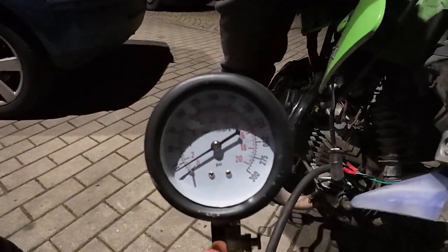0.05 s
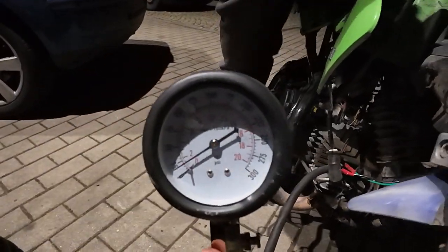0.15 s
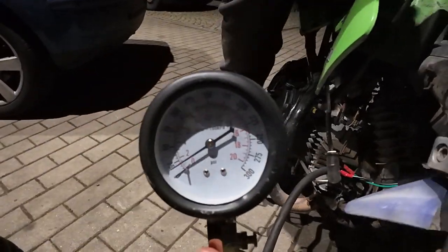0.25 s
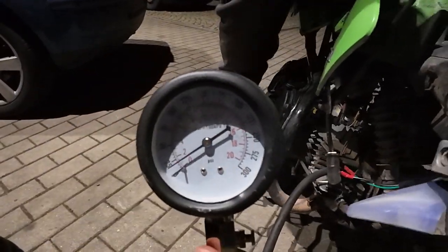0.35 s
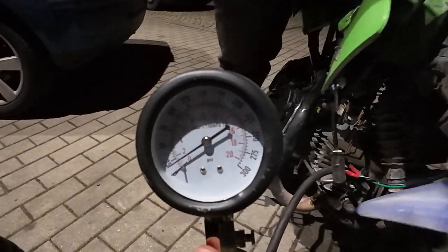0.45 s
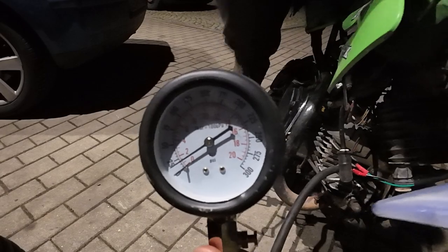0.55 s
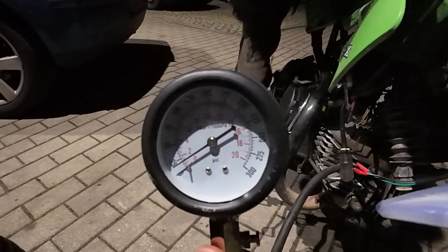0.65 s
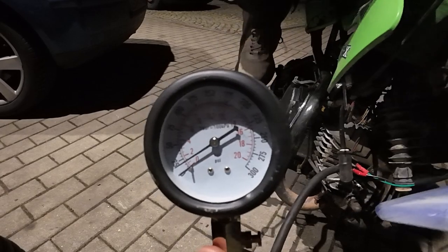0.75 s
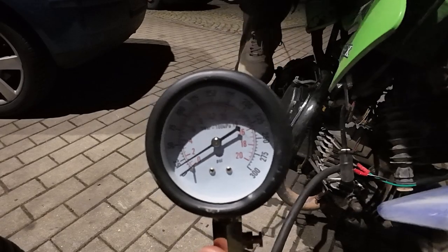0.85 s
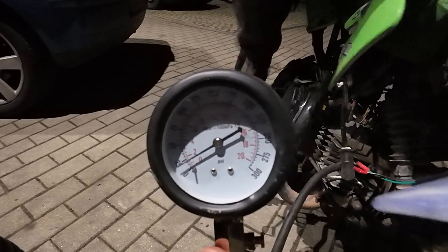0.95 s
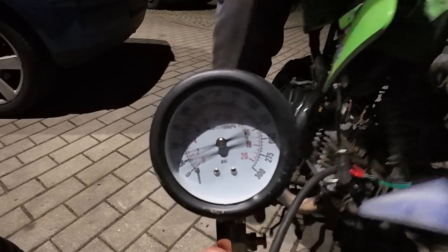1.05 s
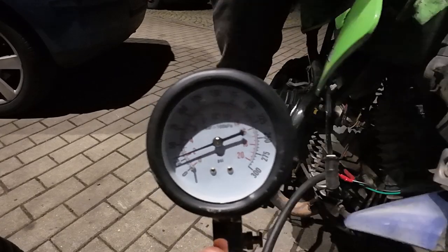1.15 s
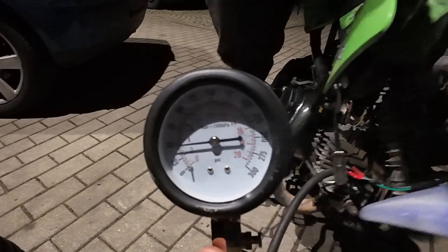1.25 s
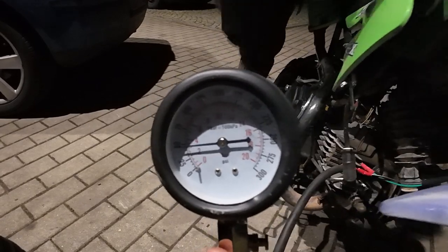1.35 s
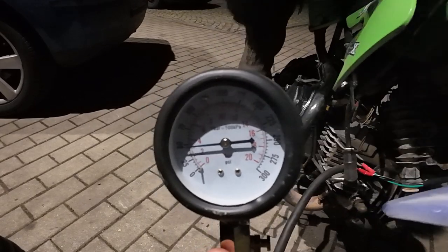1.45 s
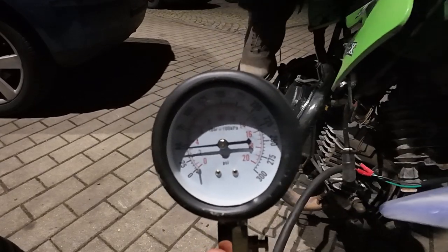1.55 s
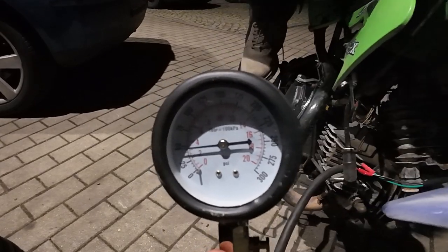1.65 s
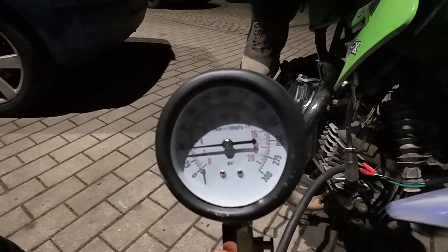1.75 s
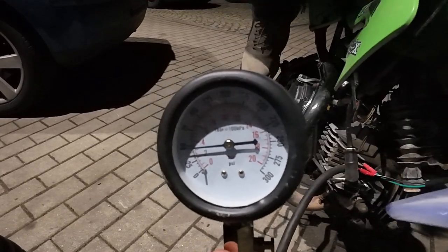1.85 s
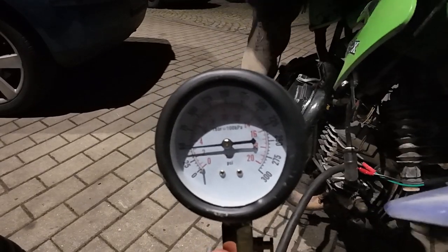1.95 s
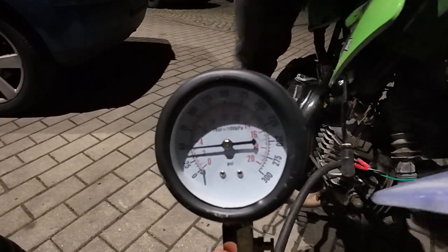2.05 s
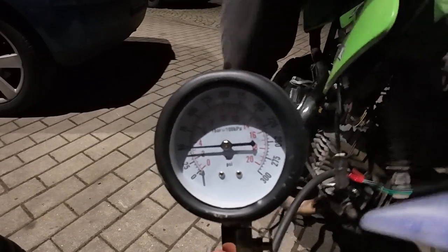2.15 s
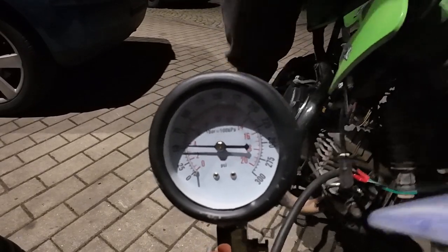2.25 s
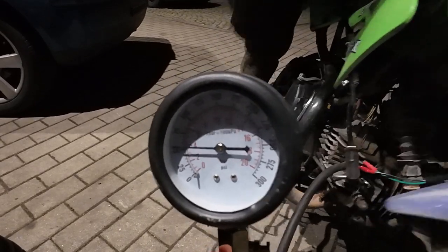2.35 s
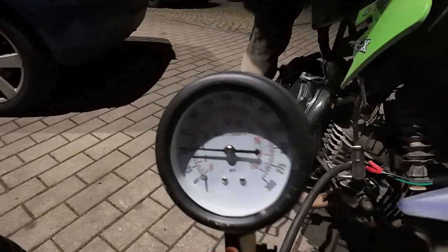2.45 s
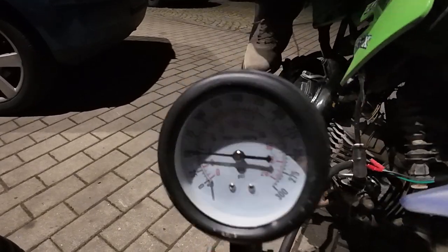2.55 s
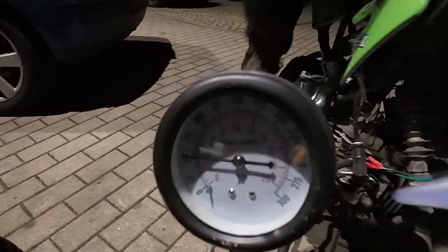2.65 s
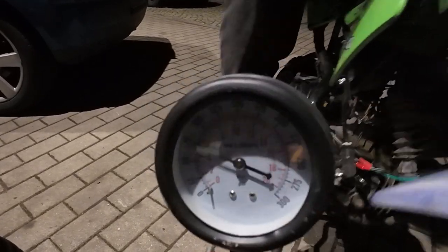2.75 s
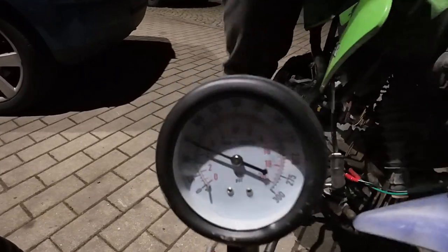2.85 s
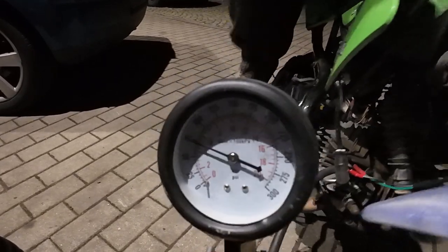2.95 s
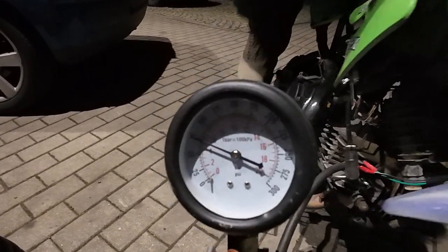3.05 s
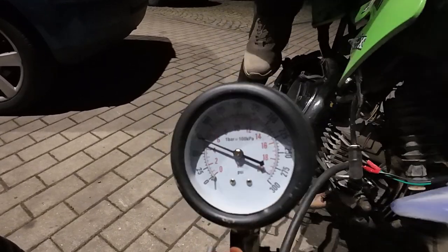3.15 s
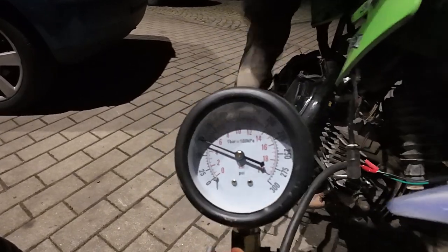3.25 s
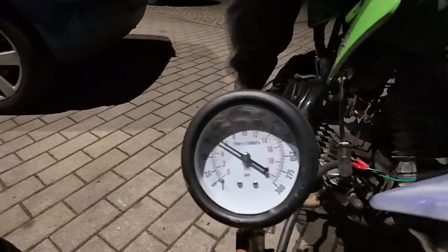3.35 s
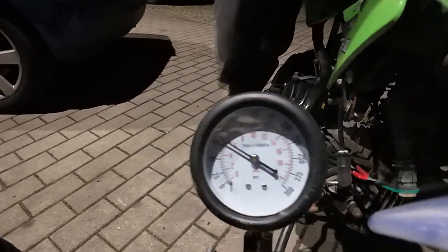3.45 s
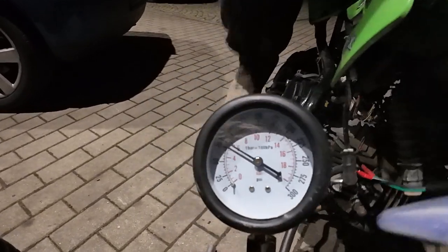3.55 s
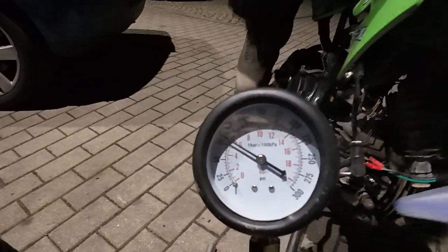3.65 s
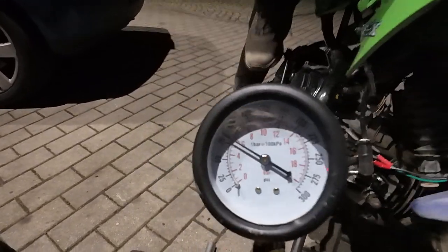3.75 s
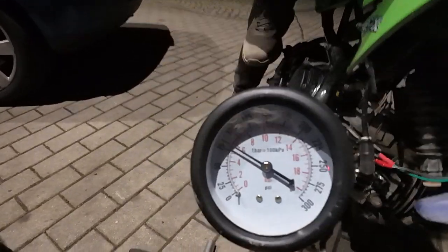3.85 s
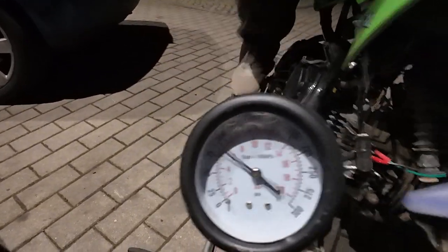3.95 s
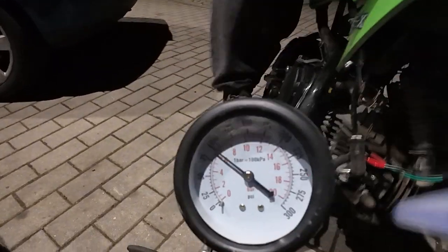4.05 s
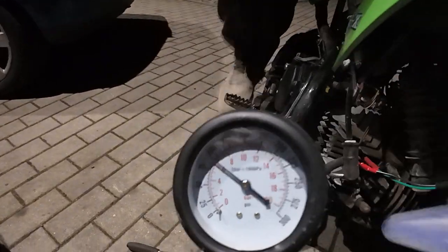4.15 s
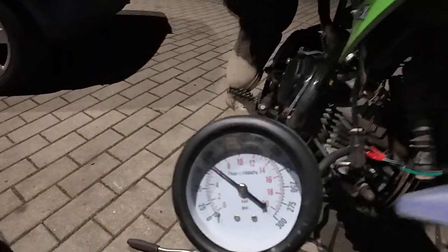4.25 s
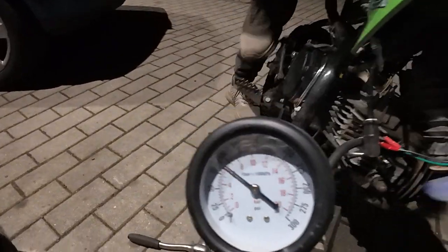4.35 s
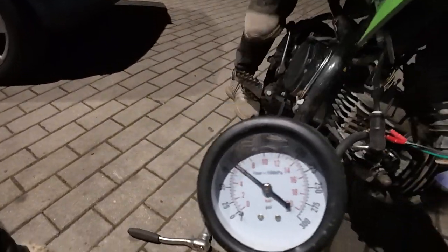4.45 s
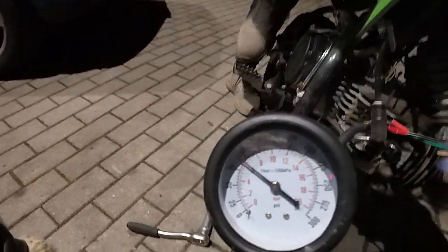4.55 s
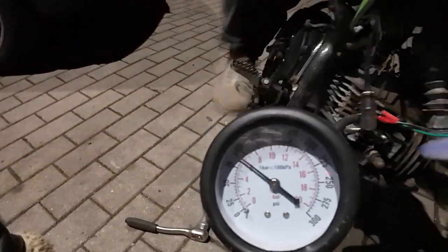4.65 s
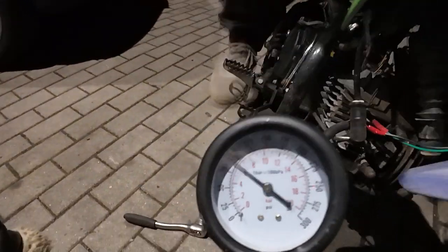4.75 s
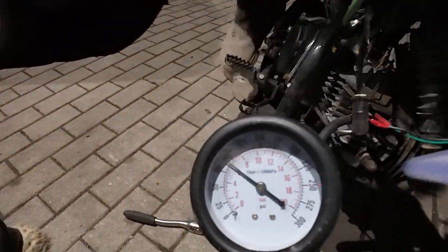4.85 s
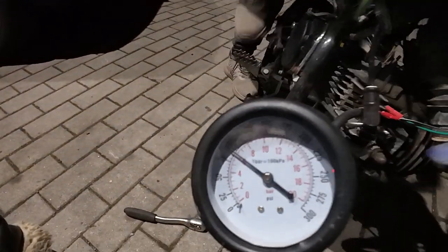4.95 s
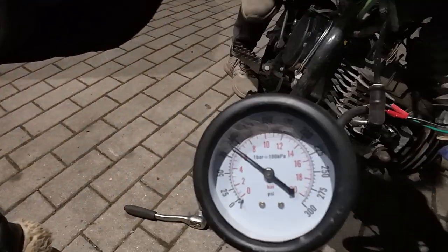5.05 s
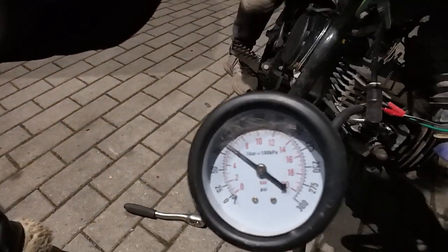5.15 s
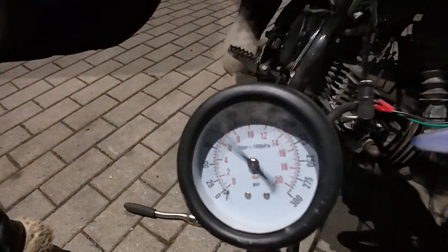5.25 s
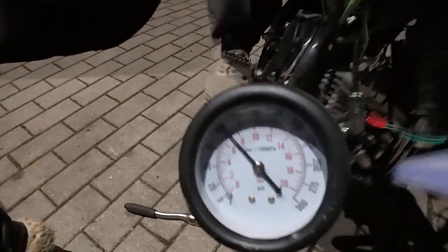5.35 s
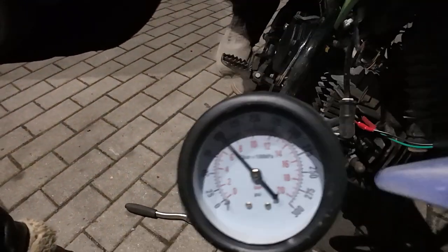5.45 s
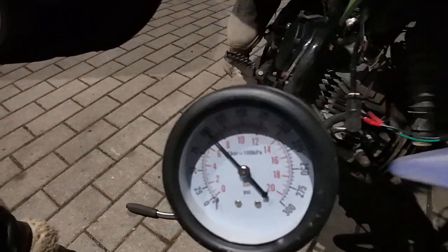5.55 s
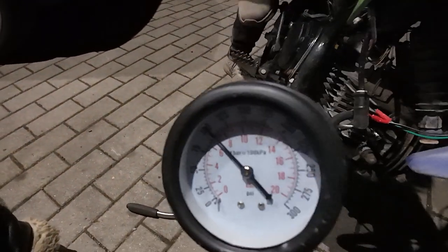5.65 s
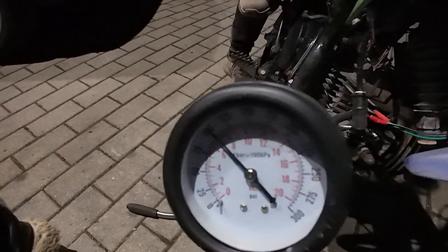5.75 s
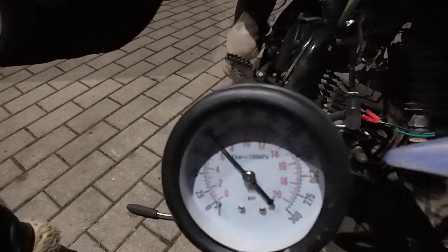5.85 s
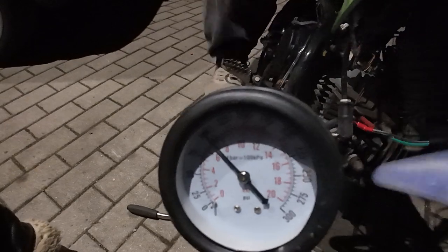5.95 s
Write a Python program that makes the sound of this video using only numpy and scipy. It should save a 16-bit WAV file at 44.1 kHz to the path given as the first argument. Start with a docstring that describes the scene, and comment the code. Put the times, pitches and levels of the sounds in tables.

```python
"""A boot scrapes and a kick lever ticks in a paved yard, close to a hand-held microphone pair.
Then a small single-cylinder engine is kicked over eight times: the starter gear clunks in, gear teeth
rattle, air hisses through the passages, exhaust strokes thump in the pipe, and between kicks the lever
clinks back on its stop. Light wind rumbles in the microphones; the yard adds short, bright echoes."""
import sys
import numpy as np
from scipy import signal
from scipy.fft import rfft, irfft, next_fast_len
from scipy.io import wavfile

SR = 44100
rng = np.random.default_rng(int(sys.argv[2]) if len(sys.argv) > 2 else 0)


def unload_wav(signal):
    """Save mono or channel-first audio to the path in sys.argv[1] as 16-bit WAV at rate SR, clipped to [-1, 1]."""
    wavfile.write(
        sys.argv[1],
        SR,
        np.round(np.clip(np.atleast_2d(signal).T, -1, 1) * 32767).astype(np.int16),
    )


N = 265041

# Levels are relative within each source; spectra give level per hertz.
# spectra of the distant air and of a faint rustle: f/Hz, level/dB
AIR_SPECTRUM = [(200, -21), (320, -3.5), (900, -3.5), (2500, -13.5), (5000, -18.5), (13800, -26.5),
                (16200, -31)]
RUSTLE_SPECTRUM = [(400, -29), (1000, -22), (6400, -12), (8200, -18), (10100, -16), (11800, -21),
                   (13600, -10), (16200, -21)]
# course of the rustle: t/s, level/dB
RUSTLE_LEVELS = [(0, -58.5), (.5, -61), (.75, -50.5), (.9, -99)]
# wind on the microphones: t/s, level/dB
WIND_LEVELS = [(0, -56), (.25, -50), (.35, -31.5), (.45, -50), (1.45, -49.5), (1.79, -41.5), (1.83, -33),
               (1.99, -31.5), (2.04, -43), (2.62, -41.5), (3.03, -34), (3.18, -59), (3.4, -31),
               (3.899, -50), (4.6, -47), (5.3, -33.5), (5.8, -26), (6.01, -39)]
# its rumble: f/Hz, level/dB
WIND_SPECTRUM = [(12, -33), (20, 5.5), (101, -7.5), (170, -13.5), (262, -26), (304, -34), (334, -58),
                 (500, -78), (650, -119), (1100, -120)]
# boot rubbing on the lever before the first kick: t/s, level/dB
SCRAPE_LEVELS = [(0.098, -55.5), (.2, -46.5), (.24, -38.5), (.3, -42.5), (.34, -36.5), (.42, -37.5),
                 (.46, -57), (.6, -48.5), (0.731, -46.5)]
# its grit: f/Hz, level/dB
SCRAPE_SPECTRUM = [(88, -49), (150, 0.5), (335, -10.5), (615, -12), (876, -10.5), (2240, -19), (9020, -32),
                   (13600, -35), (16200, -35)]
# knocks and ratchet ticks of the linkage: t/s, level/dB, centre f/Hz
LINKAGE_TICKS = [(0.098, -46, 1410), (0.135, -40, 402), (.157, -50, 9000), (.169, -25.5, 920),
                 (.197, -42, 1000), (0.221, -29, 2530), (0.232, -22, 1570), (.255, -20.5, 1180),
                 (.326, -26, 550), (0.351, -29.5, 2260), (0.393, -21.5, 1370), (.405, -32.5, 2520),
                 (.414, -43, 2500), (.426, -38.5, 3020), (0.582, -33, 1620), (0.638, -32.5, 1090),
                 (.685, -34.5, 1330), (1.041, -16, 3200), (1.218, -13, 2200), (1.399, -39, 5130),
                 (1.42, -40, 5030), (1.491, -38, 3770), (1.513, -34.5, 1270), (1.615, -39, 1390),
                 (1.841, -60, 4850), (1.881, -55, 2040), (1.956, -61, 2150), (2.15, -13, 2670),
                 (2.822, -21, 1540), (4.755, -17, 1980), (5.41, -10, 3020)]
# lever taking up its slack: t/s, level/dB
SLACK_KNOCKS = [(1.989, -58.5), (3.303, -32), (3.948, -33.5), (4.598, -24.5), (5.206, -38.5),
                (5.859, -33.5)]
# lever hitting its stop: t/s, level/dB, ring level/dB, ring time factor (the boot damps it)
LEVER_CLINKS = [(0.7422, -15.5, -20, 1.12), (1.5684, -14, -15.5, 1.37), (2.5148, -13.5, -18, 1),
                (3.1588, -14.5, -11.5, 0.71), (3.786, -15.5, -26, 0.82), (4.4815, -23, -41, .9),
                (5.1025, -15, -16, 1), (5.731, -13.5, -16, 0.73)]
# modes of the steel arm: f/Hz, level/dB, T60/s
LEVER_MODES = [(1023, -32, .2), (1319, -22, .5), (1925, -13, .16), (2560, -12, .28), (3185, -10, .36),
               (3530, -8, .12), (3828, -7, .23), (3865, -2, .12), (4340, -5, .09), (4834, -14, .15),
               (6108, -18, .15), (7400, -25, .18)]
# crack against the stop: f/Hz, level/dB
CRACK_SPECTRUM = [(240, -56), (400, -26.5), (1470, -8.5), (2570, -9.5), (3560, -3.5), (4560, -11),
                  (5000, -12), (6610, -18), (13100, -27.5), (16200, -35)]
# starter gear engaging: t/s, chatter level/dB, thud level/dB
STARTER_CLUNKS = [(0.9616, -15, -22.5), (2.049, -7, -22.5), (2.682, -7.5, -19.5), (3.3298, -6, -19.5),
                  (3.9738, -1, -14), (4.6269, 0.5, -19.5), (5.2527, -5.5, -15), (5.8864, -1.5, -13.5)]
# teeth chattering into mesh: f/Hz, level/dB
MESH_SPECTRUM = [(290, -2.5), (500, -12), (650, -1.5), (991, -3.5), (1680, -1), (1990, -5), (3270, -7.5),
                 (5220, -11), (7080, -24), (13400, -29.5), (16200, -35)]
# crankcase modes: f/Hz, level/dB, T60/s
CRANKCASE_MODES = [(199, -4, 0.054), (299, -25.5, 0.13), (574.7, 0.5, 0.06), (926, -50, 0.017)]
# gear train in each kick: start t/s, level/dB, fastest t/s, level/dB, stop t/s, level/dB, hiss level/dB
KICKS = [(0.997, -34, 1.216, -25.5, 1.55, -67.5, -25), (2.079, -30.5, 2.306, -26, 2.5, -47, -26),
         (2.712, -32, 2.95, -26.5, 3.15, -44.5, -26.5), (3.359, -31.5, 3.61, -27.5, 3.78, -42, -23),
         (4.004, -28, 4.21, -25, 4.58, -53, -25.5), (4.653, -28, 4.85, -24.5, 5.09, -48.5, -23.5),
         (5.287, -27, 5.525, -25, 5.85, -51, -25.5), (5.917, -26, 6.12, -32, 6.3, -59, -21.5)]
# slow piston strokes as the crank coasts: start t/s, length/s, hiss level/dB
COASTING_STROKES = [(1.237, 0.053, -25.5), (1.301, 0.083, -29), (2.3, 0.048, -34), (2.349, 0.059, -25),
                    (2.39, .1, -34), (2.963, 0.061, -34), (3.023, 0.061, -26), (3.077, 0.091, -30),
                    (3.587, 0.05, -29.5), (3.64, 0.052, -24), (3.685, 0.096, -27.5), (4.244, 0.074, -23.5),
                    (4.346, 0.068, -27), (4.422, 0.055, -30.5), (4.876, 0.05, -23), (4.927, .053, -25),
                    (4.966, 0.1, -32), (5.529, 0.058, -24), (5.579, 0.077, -26.5), (5.66, 0.14, -30.5)]
# crank rocking back once the lever is home: start t/s, end t/s, gear level/dB, hiss level/dB
CRANK_ROCKS = [(3.196, 3.296, -40, -41), (3.814, 3.922, -40, -39)]
# resonances of the air passages and of the engine covers: f/Hz, width/Hz, level/dB
PASSAGE_MODES = [(660, 245, -7), (1761, 113, -0.5), (3056, 186, 2.5), (4580, 1040, -5.5), (5840, 520, -9.5),
                 (8280, 280, -3), (9860, 460, -15.5), (13800, 610, -11), (14200, 630, -25)]
COVER_MODES = [(1070, 870, -14), (1544, 49, 3.5), (2183, 190, 8.5), (2560, 340, -8), (3820, 154, 5),
               (4350, 83, -6.5), (4985, 330, 2), (6370, 150, 1)]
# spectra of the rattling gears and of the shaking frame: f/Hz, level/dB
GEAR_SPECTRUM = [(150, -13), (250, -0.5), (348, -8), (1180, -6), (1540, -10.5), (3040, -2.5), (7150, -12.5),
                 (8370, -8), (12100, -20), (13900, -22), (16200, -74)]
FRAME_SPECTRUM = [(15, -51), (40, 4.5), (100, 5), (300, -14), (500, -54)]
# exhaust thumps: first crest t/s, level/dB, starting f/Hz, delay until the valve shuts/s
EXHAUST_THUMPS = [(1.052, -4.5, 73, .022), (1.154, -4.5, 69.5, .026), (2.0973, -11.5, 68.6, .038),
                  (2.1999, -4, 68.6, .02), (2.3208, -6.5, 67.7, .058), (2.7994, -6, 69.7, .021),
                  (2.9058, -7, 68, .03), (3.424, -5.5, 65.7, .022), (3.5303, -7.5, 70, .036),
                  (4.064, -4.5, 65, .021), (4.1613, -6.5, 69.8, .026), (4.6794, -9, 68, .023),
                  (4.7748, -4.5, 67.5, .0233), (4.8978, -8.5, 67, .048), (5.362, -4.5, 75.5, .02),
                  (5.452, -4.5, 70, .023), (5.6068, -15.5, 62.5, .07), (5.9924, -4, 75, .009)]
# share of the sound that flits between the microphones: f/Hz, level/dB
FLIT_SPECTRUM = [(30, -21), (100, -31.5), (1000, -28.5), (3000, -17), (8000, -3), (16000, -6.5)]


def amp(db):
    """Decibels to gain."""
    return 10 ** (np.asarray(db) / 20)


def unit_rms(x):
    """Scales to rms 1."""
    return x / np.sqrt(np.mean(x ** 2) + 1e-20)


def gain_at(spectrum, hz):
    """Gain of a spectrum, read on a log-frequency axis."""
    f, db = np.transpose(spectrum)
    return amp(np.interp(np.log(hz + 1), np.log(f + 1), db))


def add(mix, s, sound):
    """Mixes a sound in at s seconds."""
    part = mix[round(s * SR):][:len(sound)]
    part += sound[:len(part)]


def coloured(x, spectrum):
    """Shapes x by a spectrum, rms 1."""
    size = next_fast_len(len(x))
    gain = gain_at(spectrum, np.fft.rfftfreq(size, 1 / SR))
    return unit_rms(irfft(rfft(x, size) * gain, size)[:len(x)])


def noise(spectrum, samples=N):
    """Coloured noise, rms 1."""
    return coloured(rng.standard_normal(samples), spectrum)


def resonate(x, hz, width):
    """One resonance, its width in Hz."""
    pole = np.exp((2j * np.pi * hz - np.pi * width) / SR)
    return 2 * signal.lfilter([1 - abs(pole)], [1, -pole], x).real


def wander(per_s):
    """A random drift that turns about per_s times a second."""
    knots = rng.standard_normal(2000)
    return 0.77 * np.interp(np.arange(N) / SR * per_s, np.arange(2000), knots)


def struck(modes, t, spread_db):
    """Dying modes of a struck body; each blow draws new phases and scatters the levels by spread_db."""
    draws = rng.standard_normal((len(modes), 2))
    return sum(amp(db + spread_db * scatter - 60 * t / t60) * np.sin(2 * np.pi * hz * t + phase)
               for (hz, db, t60), (scatter, phase) in zip(modes, draws))


def yard_air():
    """Quiet air far off, and a faint bright rustle that fades within the first second."""
    centre, left, right = (amp(-64) * noise(AIR_SPECTRUM) for _ in range(3))
    rustle_level = amp(np.interp(np.arange(N) / SR, *np.transpose(RUSTLE_LEVELS)))
    rustle = rustle_level * np.array([noise(RUSTLE_SPECTRUM) for _ in range(2)])
    return centre + 0.37 * np.array([left, right]) + rustle


def wind():
    """Lumpy low gusts right on the microphones, nearly alike in both."""
    level = amp(np.interp(np.arange(N) / SR, *np.transpose(WIND_LEVELS)) + 6 * wander(14))
    both, left, right = (noise(WIND_SPECTRUM) for _ in range(3))
    return level * (both + 0.22 * np.array([left, right]))


def yard_echoes(x, t60=0.025):
    """Treble scattered off nearby paving, car and engine, differently to each microphone."""
    t = np.arange(6000) / SR
    taps = rng.choice([-1., 1.], (2, len(t))) * (rng.random((2, len(t))) < .05)
    taps *= amp(-60 * t / t60) * (t > .001)
    taps = signal.sosfilt(signal.butter(1, 2500, "high", fs=SR, output="sos"), taps)
    return signal.fftconvolve(x[None], taps / np.linalg.norm(taps[0]), axes=1)[:, :N]


def cooling_fin(shaking, hz=3472, t60=2.6):
    """One fin gathers energy from the shaking engine and rings on faintly."""
    retained = amp(-120 / (t60 * SR))
    energy = signal.lfilter([1 - retained], [1, -retained], shaking ** 2)
    return amp(-32) * np.sqrt(energy) * np.sin(2 * np.pi * hz * np.arange(N) / SR)


def boot_scrape():
    """The boot rubs on the lever: gritty, low and uneven."""
    db = np.interp(np.arange(N) / SR, *np.transpose(SCRAPE_LEVELS), left=-120, right=-120)
    return amp(db + 4.5 * wander(150.1)) * noise(SCRAPE_SPECTRUM)


def linkage():
    """Ratchet ticks and the longer knocks of slack taken up, each a broad band of noise."""
    out, t = np.zeros(N), np.arange(5000) / SR
    for knocks, t60 in ((LINKAGE_TICKS, 0.051), ([(s, db, 2560) for s, db in SLACK_KNOCKS], 0.1)):
        for s, db, hz in knocks:
            white = rng.standard_normal(len(t))
            body = resonate(resonate(white, hz, .9 * hz), hz, 2 * hz)
            knock = unit_rms(body + .015 * white + .12 * resonate(white, 13600, 2500))
            add(out, s, amp(db - 60 * t / t60) * np.minimum(t / 0.00039, 1) * knock)
    return out


def lever_return():
    """The lever cracks against its stop with a short rattle, and the steel arm rings."""
    out, t = np.zeros(N), np.arange(20000) / SR
    burst = np.minimum(t / 0.0019, 1) * (amp(-60 * t / 0.044) + amp(-20.5 - 60 * t / 0.19))
    for s, db, ring_db, stretch in LEVER_CLINKS:
        modes = [(hz, mode_db, t60 * stretch) for hz, mode_db, t60 in LEVER_MODES]
        ring = amp(ring_db) * np.minimum(t / 0.0013, 1) * struck(modes, t, spread_db=2)
        crack = amp(-2.5) * burst * noise(CRACK_SPECTRUM, len(t))
        add(out, s, amp(db) * (crack + ring))
    return out


def starter_gear():
    """Teeth chatter into mesh for a moment, then the crankcase thuds."""
    out, t = np.zeros(N), np.arange(6000) / SR
    chatter = np.minimum(t / 0.0016, 1) * amp(-60 * np.maximum(t - .009, 0) / 0.1)
    for s, chatter_db, thud_db in STARTER_CLUNKS:
        add(out, s, amp(chatter_db - 13) * chatter * noise(MESH_SPECTRUM, len(t)))
        thud = (1 - np.exp(-t / 0.0022)) * struck(CRANKCASE_MODES, t, spread_db=0)
        add(out, s + 0.00525, amp(thud_db + 6.5) * thud)
    return out


def driven_strokes(stroke_s=.027, centre_lag_s=.016):
    """Quick strokes under the foot, with a dead centre just after a thump: t/s, length/s, level/dB."""
    strokes = []
    for start, _, _, _, stop, _, hiss_db in KICKS:
        coast = min([s for s, *_ in COASTING_STROKES if s > start] + [stop])
        centres = [s + centre_lag_s for s, *_ in EXHAUST_THUMPS if start < s < coast - 2 * stroke_s]
        marks = [start, *centres, coast]
        for begin, end in zip(marks, marks[1:]):
            count = max(round((end - begin) / stroke_s), 1)
            for s in begin + np.arange(count) * (end - begin) / count:
                # the crank leaps once the first compression is passed
                surge_db = 6 * np.exp(-((s - start - 0.044) / 0.017) ** 2)
                fade_in_db = -12 * np.exp(-(s - start) / 0.034)
                strokes.append((s, (end - begin) / count, hiss_db + surge_db + fade_in_db))
    return strokes


def piston_motion():
    """Piston speed as a share of its top in each stroke (1 at rest), and the airflow it drives."""
    speed, flow = np.ones(N), np.zeros(N)
    rocks = [(s, end - s, db) for s, end, _, db in CRANK_ROCKS]
    for strokes, dead_centre_dip in ((driven_strokes(), 0.62), (COASTING_STROKES + rocks, 1)):
        for s, length, db in strokes:
            arch = np.abs(np.sin(np.pi * np.linspace(0, 1, round(length * SR)) ** 0.71))
            swell = 1 - dead_centre_dip + dead_centre_dip * arch
            add(speed, s, swell - 1)
            add(flow, s, amp(db) * swell ** 1.4)
    return speed, flow


def piston_hiss(flow):
    """Air hisses through resonant passages, swelling in each stroke and sinking at the dead centres."""
    air = rng.standard_normal(N) * amp(6.2 * wander(90))
    passages = sum(amp(db) * unit_rms(resonate(resonate(air, hz, width), hz, 3 * width))
                   for hz, width, db in PASSAGE_MODES)
    return flow * unit_rms(passages)


def gear_level(let_go_s=0.12, let_go_db=-11.5):
    """The gears are loud under the foot, drop as it lets go, then run down; twice the crank rocks back."""
    t, level = np.arange(N) / SR, np.zeros(N)
    for start, start_db, fastest, fastest_db, stop, stop_db, _ in KICKS:
        db = np.interp(t, [start, fastest, fastest + let_go_s, stop],
                       [start_db, fastest_db, fastest_db + let_go_db, stop_db])
        level += np.clip(np.minimum(t - start + 0.014, stop + 0.053 - t) / 0.029, 0, 1) * amp(db)
    for start, stop, db, _ in CRANK_ROCKS:
        level += np.clip(np.minimum(t - start + 0.014, stop - t) / 0.046, 0, 1) * amp(db)
    return level


def gear_train(speed, teeth_per_s=88):
    """Teeth clack in fairly even bursts, ring the covers, falter at dead centres and shake the frame."""
    teeth_passed = np.cumsum(teeth_per_s * (1 + .2 * wander(40))) / SR
    contacts = np.diff(np.floor(teeth_passed), prepend=0)
    force = amp(2.5 * np.minimum(rng.exponential(1, N), 2.5))
    strays = rng.random(N) < 70 / SR
    clacks = force * (1.8 * contacts + strays)
    bursts = unit_rms(signal.lfilter([1], [1, -np.exp(-1 / (0.003 * SR))], clacks))
    level = gear_level()
    load = np.clip(level / amp(-28), .4, 1.8)  # teeth clack harder under load
    drive = (.7 + load * bursts) / (.7 + .8 * load) * rng.standard_normal(N)
    covers = sum(amp(db) * unit_rms(resonate(drive, hz, width)) for hz, width, db in COVER_MODES)
    grit = np.diff(drive, 2, prepend=[0, 0])  # tooth edges rasp in the top octave
    rattle = coloured(drive, GEAR_SPECTRUM) + .5 * unit_rms(covers) + amp(-8.5) * unit_rms(grit)
    brightness = np.clip(level / amp(-24), .05, 2) ** 0.54  # faster teeth sound brighter
    falter = .3 + .7 * np.clip(speed, 0, 1) ** .6
    treble = signal.sosfiltfilt(signal.butter(2, 3500, "high", fs=SR, output="sos"), rattle)
    teeth = amp(2.5) * (rattle + (brightness - 1) * treble) * falter
    return level * (teeth + amp(-1) * noise(FRAME_SPECTRUM))


def exhaust_pipe(upper_hz=195, third_hz=307, pitch_rise=0.32):
    """Each exhaust stroke sets the air column swinging; the closing valve kicks its upper modes."""
    out, t = np.zeros(N), np.arange(-.012, .2, 1 / SR)
    envelope = np.clip(1 + t / .012, 0, 1) ** 1.5 * amp(-60 * np.maximum(t - 0.019, 0) / 0.16)
    climb = np.clip((t - .01) / 0.036, 0, 1)  # the pitch rises as the cylinder shrinks
    crest = amp(-15.5 - 60 * abs(t) / 0.035) * np.cos(2 * np.pi * upper_hz * t)  # sharpens the attack
    for s, db, hz, valve_s in EXHAUST_THUMPS:
        cycles = np.cumsum(hz * (1 + pitch_rise * climb)) / SR
        cycles -= cycles[np.argmin(abs(t))]  # first crest at t = 0
        fundamental = envelope * np.cos(2 * np.pi * cycles)
        since_shut = np.maximum(t - valve_s, 0)
        valve_db = 3 - 110 * valve_s  # weaker the later the valve shuts
        ring = amp(valve_db - 60 * since_shut / 0.089) * (1 - np.exp(-since_shut / 0.0068))
        modes = np.sin(2 * np.pi * upper_hz * since_shut)
        modes += 0.24 * np.sin(2 * np.pi * third_hz * since_shut)
        add(out, s + t[0], amp(db) * (fundamental + crest + ring * modes))
    return out


def microphone_pair(x, left_lag_s=2.6e-5, shade_db=2.2):
    """Left hears a moment later and duller; parts sound from many places, so a share flits across."""
    size = next_fast_len(N + 4096)
    hz = np.fft.rfftfreq(size, 1 / SR)
    left = amp(-shade_db * (hz / 12000) ** 2) * np.exp(-1j * np.pi * hz * left_lag_s)
    share = irfft(rfft(x, size) * gain_at(FLIT_SPECTRUM, hz), size)[:N]
    flit = share * wander(60) * np.array([[1], [-1]])
    return irfft(rfft(x + flit, size) * np.array([left, 1 / left]), size)[:, :N]


def scene():
    """The engine close to the pair, with yard echoes, wind and distant air around it."""
    speed, flow = piston_motion()
    engine = gear_train(speed) + piston_hiss(flow)
    machine = engine + cooling_fin(engine) + starter_gear() + lever_return() + linkage() + boot_scrape()
    direct = microphone_pair(machine + exhaust_pipe())
    return direct + amp(-9.5) * yard_echoes(machine) + wind() + yard_air()


def record(dry):
    """The recorder clips at full scale, then cuts the treble above 15950 Hz."""
    lowpass = signal.firwin(1023, 15950, window=("kaiser", 9), fs=SR)
    return signal.oaconvolve(np.clip(dry, -1, 1), lowpass[None], "same")


dry = scene()
out = record(dry)
unload_wav(out)
```